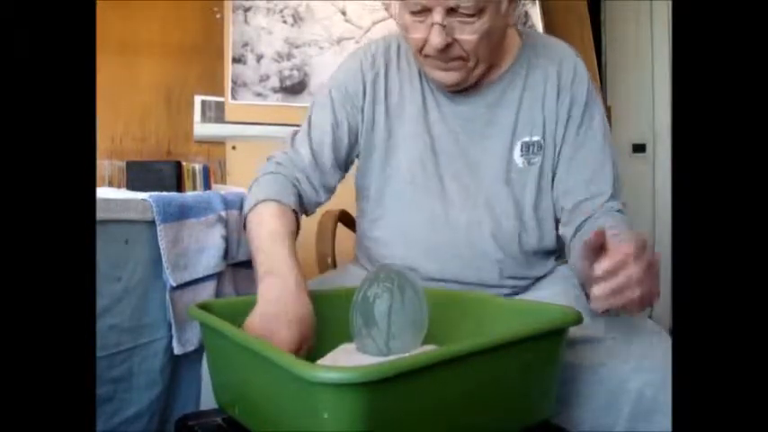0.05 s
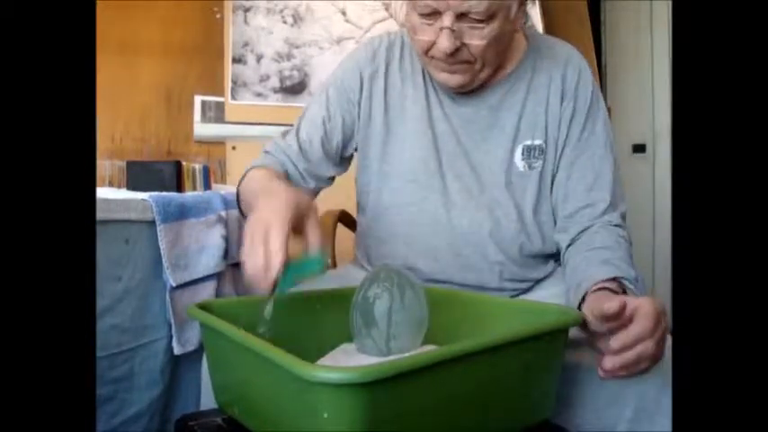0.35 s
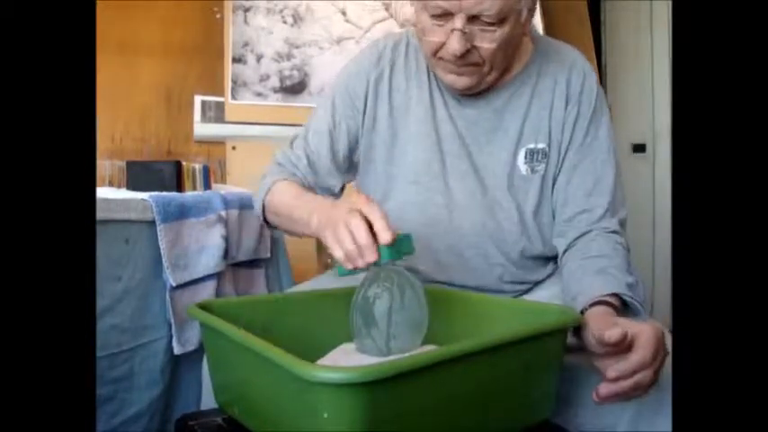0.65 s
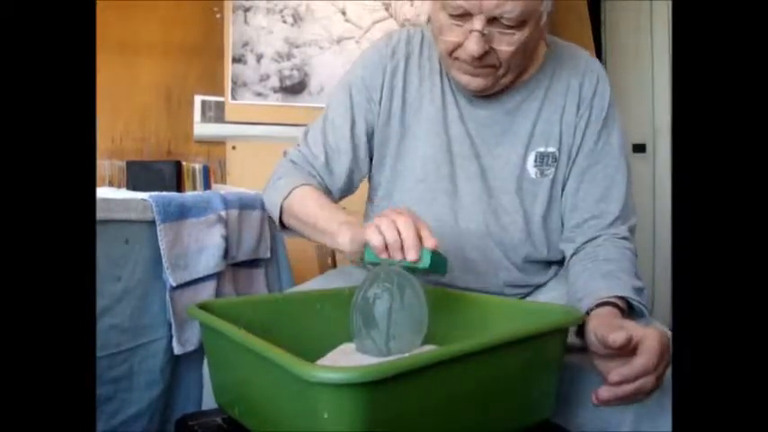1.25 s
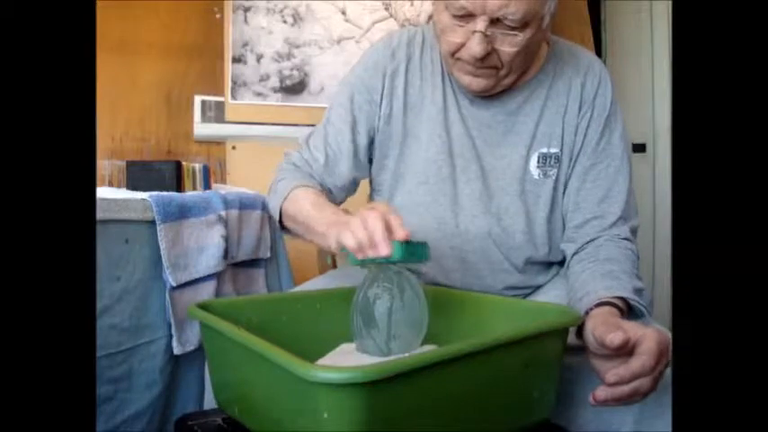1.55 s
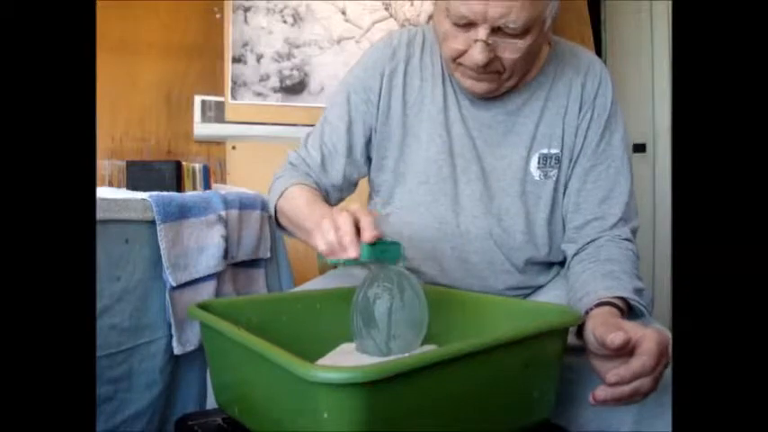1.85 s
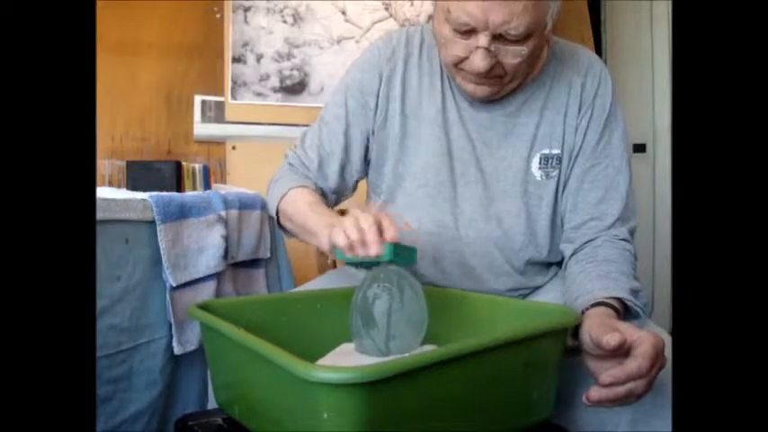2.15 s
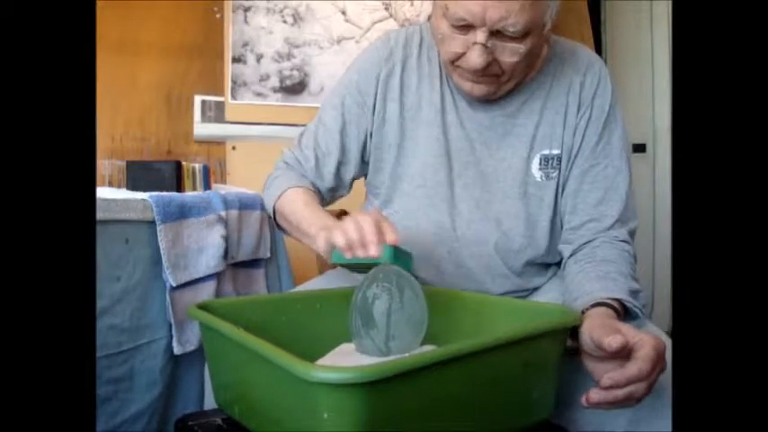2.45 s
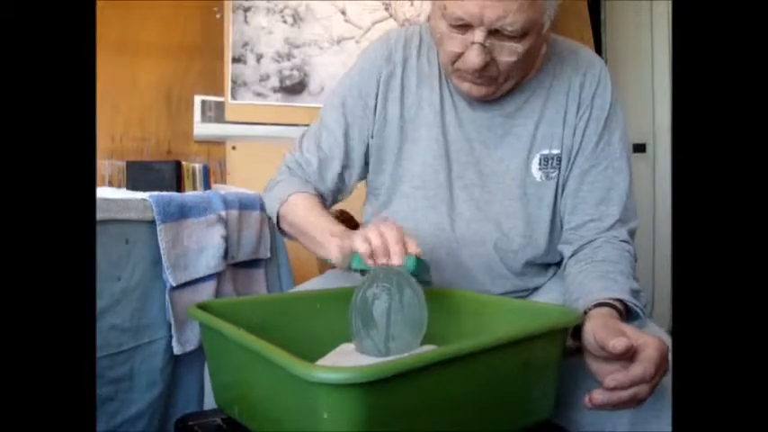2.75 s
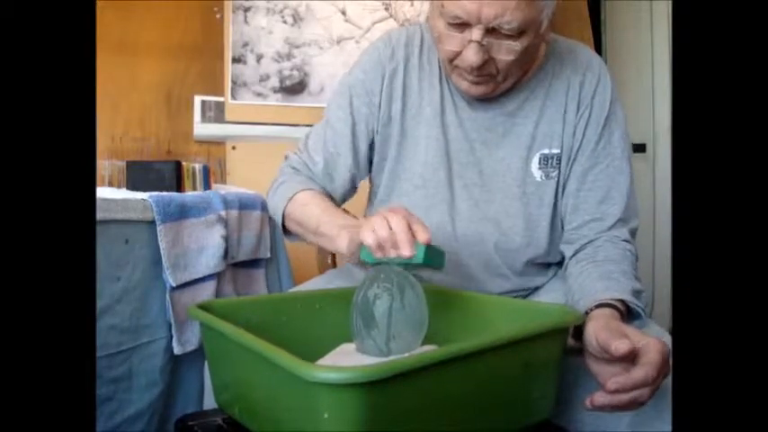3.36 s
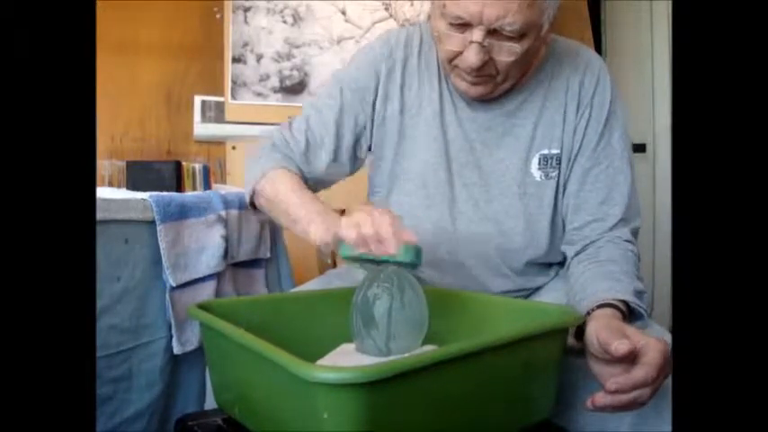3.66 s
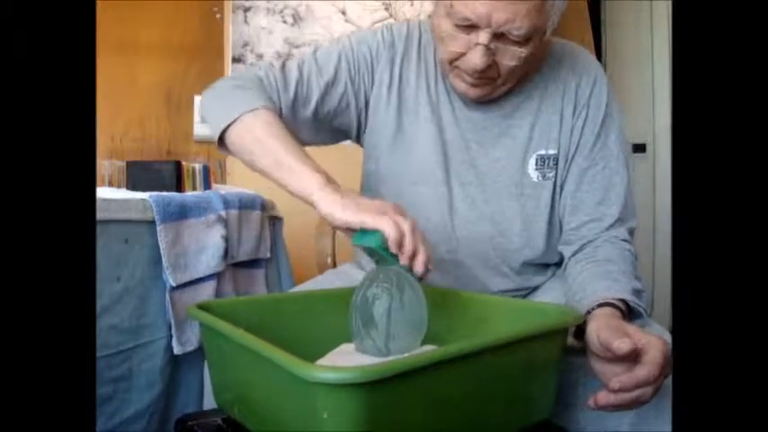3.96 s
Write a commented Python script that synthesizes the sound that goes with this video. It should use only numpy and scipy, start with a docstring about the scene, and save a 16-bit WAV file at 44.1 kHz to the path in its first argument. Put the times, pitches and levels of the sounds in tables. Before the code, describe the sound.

Steady gritty scrubbing of a wet sponge on glass, heard from nearby in a small room. It begins after a hollow knock in a plastic tub, some water drops and a light click, and continues to the end.

```python
"""A wet abrasive sponge scrubs to and fro on a glass piece: stick-slip friction of its grit, thousands
of catches a second, makes a hiss and faintly excites the resonances of the glass. Before that, the
sponge is lifted from a plastic tub, knocking its modes into vibration, sheds drops whose bubbles ring,
and lands on the glass with a click. A small quiet room, a low hum and a faint electrical ticking lie
underneath; a far motor joins late."""
import sys
import numpy as np
from scipy import signal
from scipy.fft import rfft, irfft
from scipy.io import wavfile
from scipy.ndimage import uniform_filter1d, map_coordinates

SR = 44100
rng = np.random.default_rng(int(sys.argv[2]) if len(sys.argv) > 2 else 0)


def log_audio(samples):
    """Write samples as a 16-bit WAV file to the path given in sys.argv[1]."""
    # one column per channel
    frames = np.atleast_2d(samples).T
    # limit to full scale, then quantise
    limited = np.clip(frames, -1, 1)
    pcm = np.round(limited * 32767).astype(np.int16)
    wavfile.write(sys.argv[1], SR, pcm)


N = 176400
TIME = np.arange(N) / SR
FREQ = np.maximum(np.fft.rfftfreq(N, 1 / SR), 1)
TOP_HZ = 10120


def undb(db):
    """Amplitude ratio of a level in decibels."""
    return 10 ** (np.asarray(db) / 20)

def unit(x):
    """Normalisation to rms 1."""
    return x / np.sqrt(np.mean(x ** 2))

def since(start):
    """Seconds since an onset, zero before it."""
    return np.maximum(TIME - start, 0)

def fade(start, t60):
    """Free decay: a sudden onset, then a fall of 60 dB in t60 seconds."""
    age = since(start)
    return (age > 0) * np.exp(-np.log(1000) * age / t60)

def place(sound, start):
    """Pure delay of a sound by start seconds."""
    return np.pad(sound, (max(int(start * SR), 0), N))[:N]

def colour(x, spectrum):
    """Spectral shaping through (f/Hz, level/dB) points, scaled to rms 1."""
    hz, db = np.array(spectrum).T
    gain = undb(np.interp(np.log(FREQ), np.log(hz), db))
    return unit(irfft(rfft(x) * gain, N))

def noise(spectrum):
    """Coloured Gaussian noise of rms 1."""
    return colour(rng.standard_normal(N), spectrum)

def walk(per_s):
    """Slow random drift of rms 1: noise under a double moving average."""
    span = max(int(SR / per_s), 1)
    return unit(uniform_filter1d(uniform_filter1d(rng.standard_normal(N), span), span))

def below(hz):
    """Magnitude response of a steep low-pass filter."""
    return 1 / (1 + (FREQ / hz) ** 20)

def resonance(hz, width):
    """Complex response of a damped oscillator, 1 at its peak."""
    return 1 / (1 + 1j * (FREQ ** 2 - hz ** 2) / (FREQ * width))

def echo(x, gap_s=0.0016, t60=0.33):
    """Diffuse reverberation of a small room: convolution with decaying noise."""
    tail = (rng.standard_normal(N) * fade(gap_s, t60))[:SR // 2]
    return signal.fftconvolve(x, tail / np.linalg.norm(tail))[:N]

def room(x, wet_db, reverb=echo):
    """Superposition of direct and reverberant sound at constant power."""
    return (x + undb(wet_db) * reverb(x)) / np.hypot(1, undb(wet_db))

def tone(hz, db):
    """A sinusoid of random phase at a given rms level."""
    return undb(db) * np.sqrt(2) * np.sin(2 * np.pi * (hz * TIME + rng.random()))


# Spectrum of the room air: f/Hz, relative level/dB
AIR_SPECTRUM = [(18, -31.5), (30, -13), (96, -10), (274, -8), (395, -8.5), (456, -10.5), (1960, -19.5),
                (3520, -24), (8860, -26.5), (10000, -32), (13000, -90.5), (22000, -120)]

def background():
    """Stationary ambient noise: broadband room air and one low hum."""
    return undb(-48.5) * noise(AIR_SPECTRUM) + tone(hz=142.9, db=-58)


# Spectrum of the wet rustle, also of each drop's splat: f/Hz, relative level/dB
WET_SPECTRUM = [(180, -38), (300, -31), (480, -19.5), (630, -5.5), (700, -17.5), (830, -5.5), (1000, -20),
                (1270, -10), (1500, -19), (2300, -15), (3000, -18.5), (4000, -18.5), (5090, -25),
                (10000, -36), (13000, -65), (22000, -120)]

def rustle():
    """A brief stir in the tub: noise under an exponential decay."""
    return undb(-42.5) * fade(0, t60=0.11) * noise(WET_SPECTRUM)


# Starts of the pauses in the ticking: t/s
TICK_PAUSES = [0.348, 1.248, 1.947, 2.749, 3.747]

def ticking(rate_hz=30, first_s=0.01395, width_s=0.00099, pause_s=0.2, bump_decay_s=0.031):
    """An electrical pulse train, gated off now and then, with a dull transient at both ends of a pause."""
    offset_s = (((TIME - first_s) * rate_hz + 0.5) % 1 - 0.5) / rate_hz
    pulses = np.exp(-0.5 * (offset_s / width_s) ** 2)
    ticks = undb(-39.5) * (pulses - pulses.mean())
    bump = lambda start: undb(-37) * (TIME > start) * np.exp(-since(start) / bump_decay_s)
    for start in TICK_PAUSES:
        running = (TIME < start) | (TIME > start + pause_s)
        ticks = ticks * running + bump(start) - bump(start + pause_s)
    return ticks


def splash(start, db, spectrum, t60, attack_s=0.0004):
    """Impact noise of water: a broadband burst with a fast rise and an exponential decay."""
    envelope = fade(start, t60) * (1 - np.exp(-since(start) / attack_s))
    return undb(db) * envelope * noise(spectrum)


# Knocks of hand and sponge in the tub: t/s, thud level/dB, spatter level/dB
TUB_KNOCKS = [(0.2129, -37, -40), (0.243, -52, -34), (.251, -48, -39), (0.2588, -20.5, -47),
              (.268, -24, -21), (0.2753, -22, -23.5), (.280, -37, -27), (.295, -30, -42)]
# Normal modes of the tub: f/Hz, relative level/dB, T60/s
TUB_MODES = [(217.4, -11, 0.23), (285.2, -3, .18), (354, -10.5, 0.12), (410, -11, 0.11), (490, -5, 0.1),
             (560, -8.5, .08), (756, -7.5, 0.094), (870, -11, 0.043), (1040, -21, 0.039), (1226, -14, .05)]
# Spectrum of the spattering water: f/Hz, relative level/dB
SPATTER_SPECTRUM = [(150, -32), (300, -12), (780, -1.5), (1100, -4), (1700, -18), (2500, -9), (3200, -8),
                    (3900, -7), (4500, -15), (5200, -12.5), (6300, -15), (8000, -14.5), (10000, -21),
                    (13000, -62)]

def tub(attack_s=0.0028):
    """Impulsive excitation: each knock rings the damped modes of the tub and stirs its water."""
    modes = sum(undb(db) * fade(0, t60) * np.sin(2 * np.pi * hz * TIME) for hz, db, t60 in TUB_MODES)
    thud = modes * (1 - np.exp(-TIME / attack_s))
    return sum(undb(thud_db) * place(thud, start) + splash(start, wet_db, SPATTER_SPECTRUM, t60=0.054)
               for start, thud_db, wet_db in TUB_KNOCKS)


def bubble(start, hz, t60, rise_per_s=1.2, attack_s=0.00047):
    """Damped volume oscillation of an air bubble, rising in pitch."""
    age = TIME[:SR // 4]
    ring = np.sin(2 * np.pi * hz * age * (1 + rise_per_s * age / 2))
    envelope = (1 - np.exp(-age / attack_s)) * np.exp(-np.log(1000) * age / t60)
    return place(ring * envelope, start)


# Drops falling into the tub: t/s, bubble f/Hz, bubble level/dB, spray level/dB, splat level/dB
DROPS = [(0.3426, 4750, -43, -35.5, -48), (.448, 2040, -35, -36, -49), (.550, 3240, -30.5, -37.5, -38),
         (.649, 1910, -23, -29, -34.5), (.706, 3980, -45, -41, -42), (.728, 1980, -31, -30, -34),
         (.757, 2130, -55, -54, -45)]

def drips(spray_count=10, spray_s=0.014, pitch_spread=0.1):
    """Air entrainment: each drop splats, leaving a main bubble and short-lived ones near it in pitch."""
    sound = np.zeros(N)
    for start, hz, bubble_db, spray_db, splat_db in DROPS:
        spray = sum(bubble(start + spray_s * late, hz * np.exp(pitch_spread * (3 * pitch - 1)), t60=0.016)
                    for late, pitch in rng.random((spray_count, 2)))
        sound += undb(bubble_db) * bubble(start, hz, t60=0.047) + undb(spray_db) * spray
        sound += splash(start, splat_db, WET_SPECTRUM, t60=0.12)
    return sound


# Partials of the click of grit meeting glass: f/Hz
CLICK_PARTIALS = [1770, 3350, 4830]

def touch(start):
    """Hard contact: the sponge lands on the glass with a click of heavily damped partials."""
    partials = sum(np.sin(2 * np.pi * hz * since(start)) for hz in CLICK_PARTIALS)
    return undb(-19) * fade(start, t60=0.0067) * partials


def moving_echo(x, paths=4):
    """Reflections of a moving source: the echo pattern keeps changing as the hand moves."""
    weights = np.array([walk(per_s=8) for _ in range(paths)])
    weights /= np.linalg.norm(weights, axis=0)
    return sum(weight * echo(x) for weight in weights)


# Spectrum of the friction noise: f/Hz, relative level/dB
GRIT_SPECTRUM = [(120, -48), (200, -27), (277, -28.5), (432, -19.5), (552, -11), (729, -13.5), (817, -14),
                 (873, -11.5), (1030, -10.5), (1850, -2.5), (2450, -2.5), (3390, -2), (4050, -3),
                 (4700, -2), (5110, -2), (10000, -15.5), (13000, -77), (22000, -120)]

def grit(catches_per_s=12000, spread_db=2.7, smooth_db=-2, chatter_db=0.45):
    """Stick-slip friction: random impulses of uneven strength over smooth noise, heard in the room."""
    catches = (rng.random(N) < catches_per_s / SR) * rng.choice([-1, 1], N)
    strength = undb(spread_db * np.minimum(rng.exponential(size=N), 6))
    friction = unit(catches * strength) + undb(smooth_db) * rng.standard_normal(N)
    friction *= undb(chatter_db * walk(per_s=250))
    return colour(room(friction, wet_db=-8.5, reverb=moving_echo), GRIT_SPECTRUM)


def hiss(friction_fft, drift_db=1.2):
    """Independent amplitude modulation of adjacent bands makes the colour of the hiss wander."""
    lowpasses = [below(hz) for hz in np.geomspace(700, 9000, 12)]
    bands = np.diff(lowpasses, axis=0, prepend=0, append=1)
    return sum(irfft(friction_fft * band, N) * undb(drift_db * walk(per_s=21)) for band in bands)


# Modes of the rubbed glass: f/Hz, bandwidth/Hz, relative level/dB
GLASS_MODES = [(729, 25, -3), (887, 25, 0), (1157, 20, -1), (1349, 25, -5), (1503, 40, -4), (1775, 50, -4),
               (1910, 40, -3), (2030, 35, -8), (2175, 40, -2), (3030, 40, -10), (3280, 60, -10),
               (5165, 35, -8)]

def glass(friction_fft, trim_db=0.5, grip_db=3):
    """Forced vibration: friction drives the modes of the glass, each more or less as the grip shifts."""
    return sum(irfft(friction_fft * resonance(hz, width), N) * undb(db + trim_db + grip_db * walk(per_s=7))
               for hz, width, db in GLASS_MODES)


# Hollow resonances where sponge meets glass: f/Hz, bandwidth/Hz, relative level/dB
CONTACT_MODES = [(1900, 170, -10), (3440, 300, -9), (5150, 150, -8)]

def hollow(friction_fft, stroke_db, stroke_s=0.36, shift_per_db=0.012, swell_db_per_db=0.3):
    """Contact resonance: broad peaks rise in pitch and stand out as the sponge is pressed harder."""
    response = sum(undb(db) * resonance(hz, width) for hz, width, db in CONTACT_MODES)
    ring = irfft(friction_fft * response, N)
    pressure_db = stroke_db - uniform_filter1d(stroke_db, int(stroke_s * SR))
    clock = np.cumsum(1 + shift_per_db * pressure_db)  # a faster clock raises the pitch
    return map_coordinates(ring, [clock], mode="mirror") * undb(swell_db_per_db * pressure_db)


# Course of the strokes: t/s, stroke level/dB, then relative to it rasp, high hiss and treble level/dB
STROKES = [(0.83, -40.5, 9, 1, -2), (0.85, -40, 2.5, -1, -15), (0.88, -35, 5.0, 2.5, 0.5),
           (0.9, -32, 2.0, 3, -6), (0.95, -32, -2.5, 1.5, -5.5), (0.97, -33.5, 0.5, -6.0, -7),
           (1.0, -29.0, -2, 0.5, -3), (1.19, -28.0, 0.0, 1.5, -2.5), (1.22, -29.5, -1.5, -0.5, -5),
           (1.28, -29, -4, -2.5, -6.5), (1.32, -25.5, -3, -2, -6.5), (1.35, -32.5, 6, 2.0, -2.5),
           (1.38, -28.5, -0.5, -1.5, -5.5), (1.43, -32.0, 2, 1, -0.0), (1.47, -27.5, -1, -3.0, -6.5),
           (1.57, -28.5, -1, 2.5, -3.5), (1.63, -32.5, -1.5, -1.5, -3.5), (1.66, -30.0, -0.0, 1.5, -8),
           (1.69, -30.5, -2.5, 0, -5.0), (1.72, -28.5, -2, 0.5, -8.5), (1.84, -28.5, -3.0, -2.5, -3.5),
           (1.96, -26.5, -1, 0.5, -3.0), (2.02, -31.5, -2.0, 0.5, -5), (2.05, -30, -1.5, 4.5, -3.5),
           (2.17, -26, -3.5, -2.5, -5.5), (2.2, -29, -4, 3.0, -2), (2.25, -28, -4, -2.5, -5),
           (2.28, -26.5, -3, 1, -3), (2.35, -29, -1, 2, 1), (2.38, -28.5, -2, -5, -3),
           (2.41, -29, -3.0, 1.5, -8), (2.45, -26.0, -5, -3.5, -12), (2.52, -30.5, 0, 0.5, 0.5),
           (2.54, -27.5, -4, 1.5, -2), (2.56, -29, -1, -1, -2), (2.62, -25.5, -4.5, 4.5, -3.5),
           (2.67, -28.0, -0.0, 2.5, -1), (2.69, -29.5, -3.0, 1, -5), (2.75, -30.0, -3, 1, -5.5),
           (2.81, -27.5, -0.5, -3, -6.5), (2.85, -31.5, 0.5, -0.5, 1), (2.91, -25, -5.5, 0.5, -2.5),
           (2.94, -26, -0.5, 0, -6), (2.98, -26.5, -3.5, 3.5, -0.5), (3.02, -27.5, -0.5, 1.5, -0.5),
           (3.05, -28, -5, -2, -4.5), (3.09, -29.0, -5, -2, -9), (3.11, -26, -5.5, 1, -7),
           (3.16, -28.0, 0, 0.5, -3.5), (3.21, -30.0, -1.0, 3.5, -0.0), (3.27, -24.0, -5, -3, -5.0),
           (3.32, -27.5, -1.5, 2.5, -2.0), (3.35, -26.0, -2.5, 2.5, 0.5), (3.41, -31, -2, 2.5, -1.5),
           (3.45, -29, -2.0, 5, 0.5), (3.48, -26.5, -5, 0, -6), (3.52, -28.0, 1, 2, -4.5),
           (3.59, -30.0, -3.5, -0.5, 0.5), (3.62, -26.5, -2, 2.5, -3), (3.75, -26.0, -3.5, -0.5, 0),
           (3.77, -30, -3.5, 2.5, 0.5), (3.81, -28.5, -2, -2.0, -6.5), (3.85, -25, -3.5, -0.5, -5.5),
           (3.91, -28, -3, 0, 1.0), (3.97, -31, -0.5, -2.5, -7), (4.0, -26, 0, 2, -1)]

def scrubbing(start, attack_s=0.016, rasp_hz=2600, hiss_hz=4200, high_hz=6600):
    """Source and filter: friction noise and its resonances swell with the strokes in four bands."""
    when, stroke, rasp, high, treble = np.array(STROKES).T
    friction_fft = rfft(grit())
    stroke_db = np.interp(TIME, when, stroke)
    rubbing_fft = rfft(hiss(friction_fft) + glass(friction_fft) + hollow(friction_fft, stroke_db))
    # passband, level/dB, flicker depth/dB: the treble flickers most
    bands = [(below(rasp_hz), stroke + rasp - 0.5, 0.04),
             (below(hiss_hz) - below(rasp_hz), stroke - 0.5, 0.13),
             (below(high_hz) - below(hiss_hz), stroke + high - 1, 0.23),
             ((1 - below(high_hz)) * (FREQ < TOP_HZ), stroke + treble - 0.5, 1.01)]
    flicker = walk(per_s=55)
    sound = np.zeros(N)
    for passband, db, flicker_db in bands:
        gain = undb(np.interp(TIME, when, db) + flicker_db * flicker)
        sound += gain * unit(irfft(rubbing_fft * passband, N))
    return sound * (1 - np.exp(-since(start) / attack_s))


# First three harmonics of the motor: level/dB
MOTOR_HARMONICS = [-54, -58.5, -57]

def motor(hz=90.8, start=3.09, rise_s=0.22):
    """Periodic vibration of a far motor: a faint harmonic series that fades in."""
    harmonics = sum(tone(k * hz, db) for k, db in enumerate(MOTOR_HARMONICS, 1))
    return harmonics * np.minimum(since(start) / rise_s, 1)


def scene(landing_s=0.8245):
    """Superposition of all sources at one point, the same in both channels."""
    handling = rustle() + tub() + touch(landing_s)
    sponge = scrubbing(landing_s) + room(handling, wet_db=-4) + room(drips(), wet_db=-5)
    mono = sponge + motor() + background() + ticking()
    return np.array([mono, mono])


def record(dry):
    """Band limiting: an elliptic low-pass filter cuts the top steeply."""
    return signal.sosfilt(signal.ellip(14, 0.1, 80, TOP_HZ, fs=SR, output="sos"), dry)


dry = scene()
out = record(dry)
log_audio(out)
```